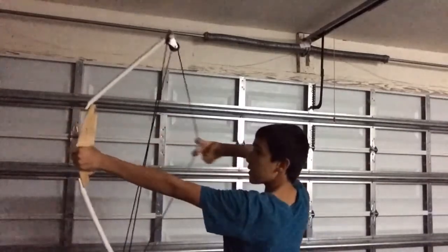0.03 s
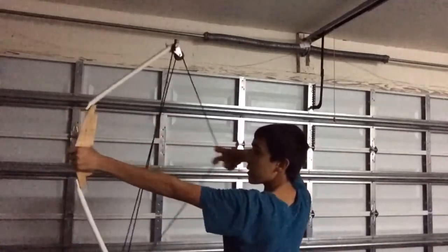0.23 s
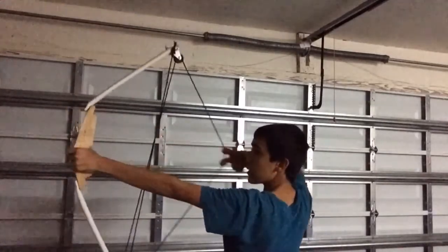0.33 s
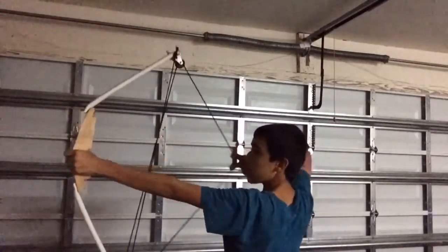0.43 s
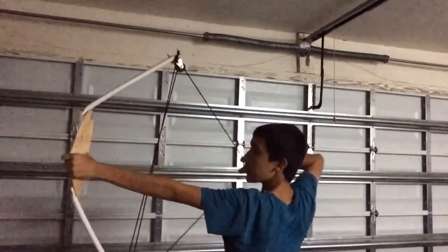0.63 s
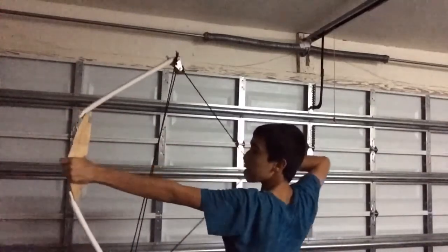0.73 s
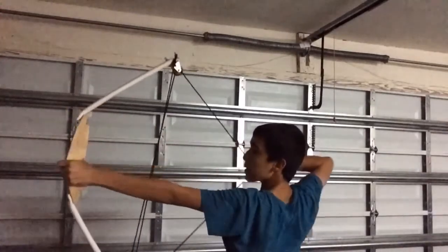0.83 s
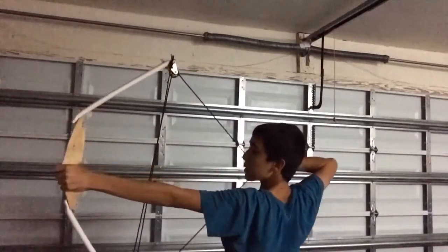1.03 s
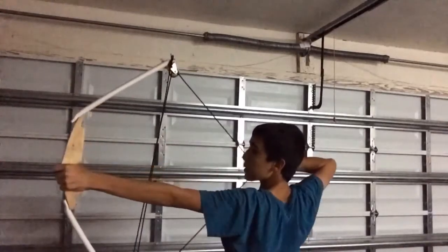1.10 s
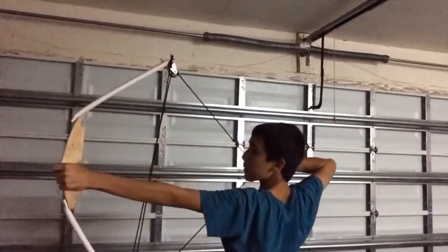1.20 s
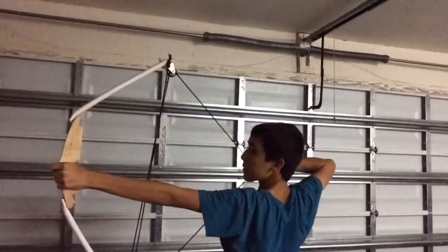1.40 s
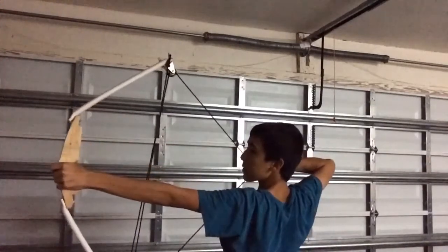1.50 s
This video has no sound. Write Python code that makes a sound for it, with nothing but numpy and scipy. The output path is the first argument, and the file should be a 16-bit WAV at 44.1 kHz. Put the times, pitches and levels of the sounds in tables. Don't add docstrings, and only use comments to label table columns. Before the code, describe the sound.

Two quick, dry, bright clicks from a bow's string slipping on its pulleys early on, splashing into short garage reverberation; then quiet motor hum and room noise, with barely audible squeaks late, one fairly near microphone.

```python
import sys
import numpy as np
from scipy import signal
from scipy.fft import rfft, irfft
from scipy.io import wavfile
from scipy.ndimage import uniform_filter1d

SR = 44100
rng = np.random.default_rng(int(sys.argv[2]) if len(sys.argv) > 2 else 0)


def file_out(sig):
    cols = np.atleast_2d(sig).T
    lim = np.clip(cols, -1, 1)
    pcm = np.round(lim * 32767).astype(np.int16)
    wavfile.write(sys.argv[1], SR, pcm)


def voltage_ratio(decibels):
    exponent = np.asarray(decibels, float) / 20
    return 10 ** exponent


N = 68355


def band(x, hz, width_hz, order=1):
    low_hz = max(np.sqrt(hz ** 2 + width_hz ** 2 / 4) - width_hz / 2, 5)
    high_hz = min(low_hz + width_hz, 0.48 * SR)
    return signal.sosfilt(signal.butter(order, [low_hz, high_hz], "band", fs=SR, output="sos"), x)


def level(x, db):
    return x * voltage_ratio(db) / np.sqrt(np.mean(x ** 2))


def walk(rate_hz):
    hold = int(SR / rate_hz)
    steps = np.repeat(rng.standard_normal(N // hold + 1), hold)
    return 1.77 * uniform_filter1d(uniform_filter1d(steps, hold), hold)[:N]


def log_interp(hz, rows_hz, values):
    return np.interp(np.log(hz), np.log(rows_hz), values)


def pulley_tick(tilt_db):
    # (frequency [Hz], level [dB])
    pulley_colour = np.array([(900, -48), (1500, -8.5), (3500, 3.5), (5200, 1.5), (6400, 3), (8000, -2),
                              (10500, -3.5), (15000, -13)])
    sharpness = 0.71
    spread_s = 0.00017
    hz = np.fft.rfftfreq(512, 1 / SR) + 1
    db = log_interp(hz, pulley_colour[:, 0], pulley_colour[:, 1])
    db = db + tilt_db * np.log2(np.clip(hz, 1000, None) / 6000)
    delay_s = spread_s * np.log2(16000 / np.clip(hz, 1500, None))
    dispersion = -2 * np.pi * np.cumsum(delay_s) * SR / 512
    cepstrum = irfft(np.log(voltage_ratio(db)))
    causal = rfft(cepstrum * np.r_[1, 2 * np.ones(255), 1, np.zeros(255)])
    phase = sharpness * causal.imag + dispersion
    return np.roll(irfft(np.exp(causal.real + 1j * phase)), 64)


def garage():
    # (delay [s], level [dB], centre [Hz], width [Hz])
    early_arrivals = [(.00016, -2, 6300, 1800), (.0013, -1, 9000, 10000), (.0018, -4, 8000, 5000),
                      (.0031, -5, 11000, 9000), (.0086, -3, 7000, 2500), (.0089, -6, 7000, 2500),
                      (.0123, -7, 7000, 8000)]
    # (frequency [Hz], level [dB], decay time T60 [s])
    tail_rows = np.array([(1230, -14, 0.73), (1480, 5, 0.38), (2340, -6.5, 0.45), (3400, -1, 0.38),
                          (5700, -1.5, .42), (7400, 3.5, .38), (10200, 2.5, 0.35), (14500, -5.5, 0.3)])
    tail_db, build_s = -25, 0.002
    late_db, late_stretch = -35, 3.3
    t = np.arange(SR) / SR
    response = 1.0 * (t == 0)
    for delay_s, db, hz, width_hz in early_arrivals:
        impulse = 1.0 * (np.arange(SR) == int(delay_s * SR))
        response = response + voltage_ratio(db) * band(impulse, hz, width_hz)
    build_up = 1 - np.exp(-t / build_s)
    for hz in 1000 * 2 ** np.arange(0, 4.1, 1 / 6):
        db = log_interp(hz, tail_rows[:, 0], tail_rows[:, 1])
        t60 = log_interp(hz, tail_rows[:, 0], tail_rows[:, 2])
        fade = voltage_ratio(-60 * t / t60) + voltage_ratio(late_db - 60 * t / (t60 * late_stretch))
        hiss = band(rng.standard_normal(SR), hz, hz / 8.83, order=2)
        response = response + voltage_ratio(tail_db + db) * build_up * fade * hiss
    return response


def string_snaps():
    # (time [s], level [dB], brightness [dB per octave])
    slips = [
        (-.13, -6, 2.5),
        (0.1675, -40.5, -7),
        (0.2038, -40, 2),
        (0.2163, -5, 5),
        (0.2977, -4, 4.95),
    ]
    lead = int(0.2 * SR)
    ticks = np.zeros(N + lead)
    for s, db, tilt_db in slips:
        start = lead + int(s * SR) - 64
        ticks[start:start + 512] += voltage_ratio(db) * pulley_tick(tilt_db)
    return signal.fftconvolve(ticks, garage())[lead:lead + N]


def motor():
    # (frequency [Hz], rms level [dB])
    hum_lines = [(58.4, -59.8), (116.9, -64.5), (120.0, -61.7), (158.9, -70.3), (318, -75.3),
                 (477.1, -73.7), (635, -80)]
    wander_db, wander_rad = 0.7, 0.1
    t = np.arange(N) / SR - 0.119
    hum = np.zeros(N)
    for hz, db in hum_lines:
        strength = np.sqrt(2) * voltage_ratio(db + wander_db * walk(5.8))
        hum += strength * np.cos(2 * np.pi * hz * t + wander_rad * walk(2.6))
    return hum


def air():
    # (frequency [Hz], density [dB per Hz])
    air_rows = np.array([(20, -27), (59, -7.5), (250, -10.5), (700, -16), (1750, -25), (4600, -31.5),
                         (8500, -38.5), (15300, -45)])
    # (centre [Hz], width [Hz], level [dB])
    room_humps = [(36, 54, -77), (91, 51, -70), (512, 52, -73), (193.6, 32, -70), (338.5, 73, -67),
                  (558.6, 15.8, -70.5), (642, 46, -75.5), (1058, 60, -76.5), (1294, 374, -72.5),
                  (1990, 16, -85), (3100, 1550, -76.5), (6060, 2370, -74.5)]
    air_db, ripple_db, ripple_hz = -61, 3.5, 29.88
    hz = np.fft.rfftfreq(N, 1 / SR) + 1
    ripple = np.interp(hz / ripple_hz, np.arange(2000), rng.standard_normal(2000))
    db = log_interp(hz, air_rows[:, 0], air_rows[:, 1]) + ripple_db * ripple * (hz > 700)
    noise = irfft(rfft(rng.standard_normal(N)) * voltage_ratio(db), N)
    noise = noise * voltage_ratio(air_db) / np.std(band(noise, 1685, 19900))
    for centre_hz, width_hz, hump_db in room_humps:
        hump = band(rng.standard_normal(N), centre_hz, width_hz, order=2)
        noise = noise + level(hump, hump_db) * voltage_ratio(0.99 * walk(6.46))
    return noise


def string_squeaks():
    # (time [s], length [s], frequency [Hz], level [dB])
    creeps = [
        (1.118, .016, 5630, -72),
        (1.185, .02, 5600, -76),
        (1.21, .05, 5200, -73),
        (1.3, .08, 5250, -77),
        (1.38, .04, 5080, -72),
    ]
    t = np.arange(N) / SR
    squeaks = np.zeros(N)
    for s, length_s, hz, db in creeps:
        swell = np.exp(-((t - s) / length_s - 0.5) ** 4 * 16)
        squeaks += level(band(rng.standard_normal(N), hz, 250), db) * swell
    return squeaks


def noise_gate(x):
    # (low edge [Hz], high edge [Hz], threshold [dB], cut [dB])
    gate_bands = [(1380, 2800, -64, -5), (2800, 5600, -60, -4), (11200, 16000, -72, -3)]
    window, knee_db = int(0.02 * SR), 0.6
    hz = np.fft.rfftfreq(N, 1 / SR)
    spectrum, out = rfft(x), x
    for low_hz, high_hz, threshold_db, cut_db in gate_bands:
        part = irfft(spectrum * ((hz >= low_hz) & (hz < high_hz)), N)
        power = uniform_filter1d(part ** 2, window, origin=int(0.02 * SR / 2) - 1)
        db = 10 * np.log10(np.abs(power) + 1e-14)
        gain_db = -cut_db / (1.5 + np.exp((threshold_db - db) / knee_db))
        out = out + part * (voltage_ratio(gain_db) - 1)
    return out


def scene():
    string = string_squeaks() + string_snaps()
    return (string + motor() + air())[None]


def band_limit(x):
    return signal.sosfilt(signal.butter(12, 16460, fs=SR, output="sos"), x)


def record(dry):
    low_pass = signal.ellip(12, 0.2, 60, 15250, fs=SR, output="sos")
    mix = signal.sosfilt(low_pass, noise_gate(dry))
    return band_limit(mix)


dry = scene()
out = record(dry)
file_out(out)
```